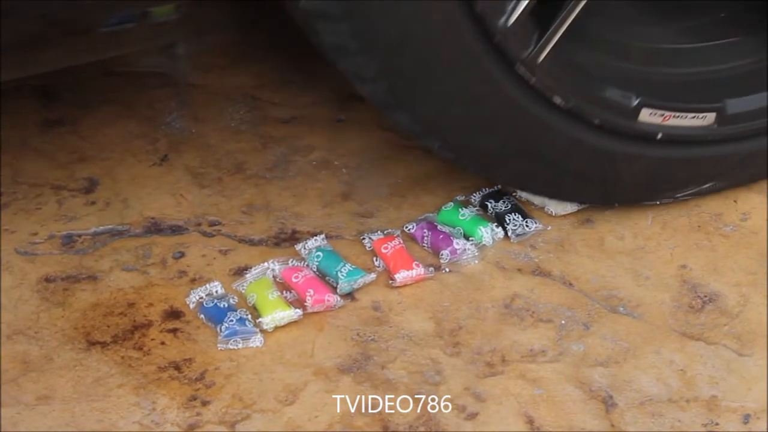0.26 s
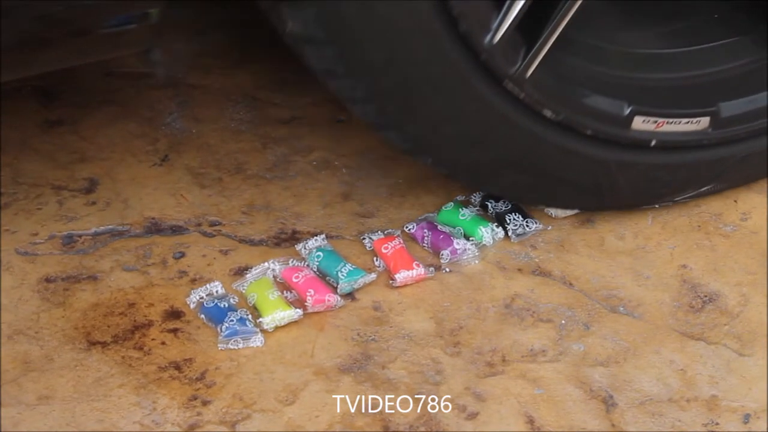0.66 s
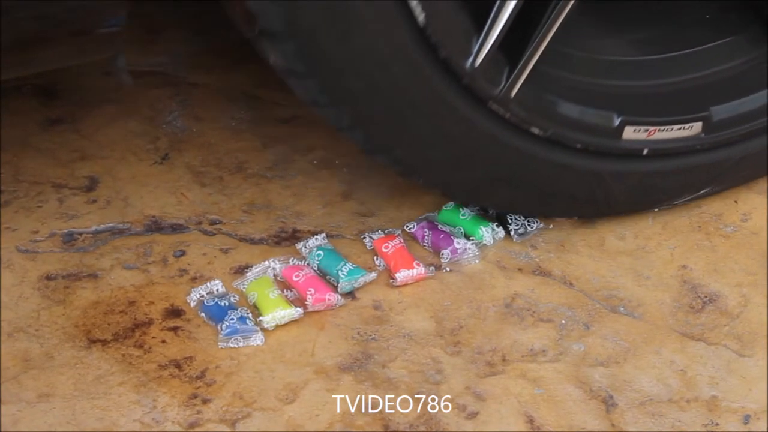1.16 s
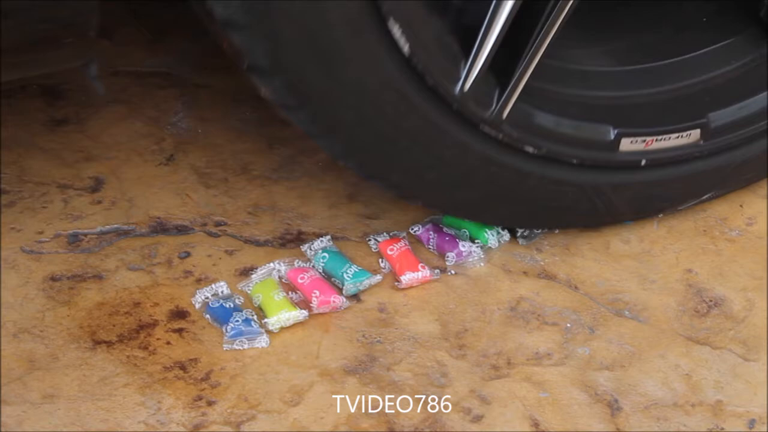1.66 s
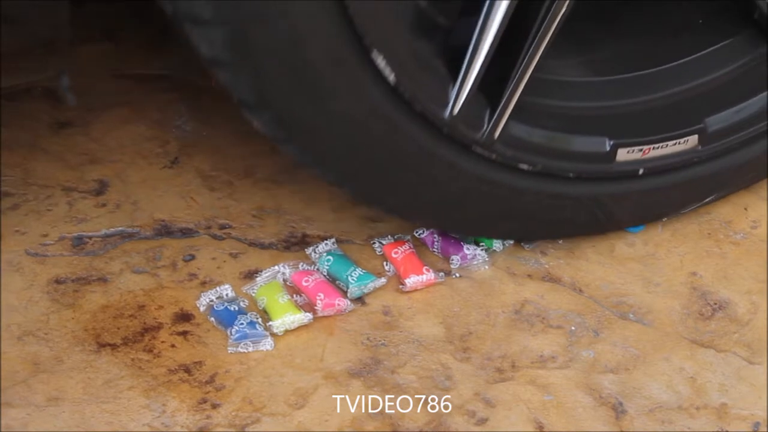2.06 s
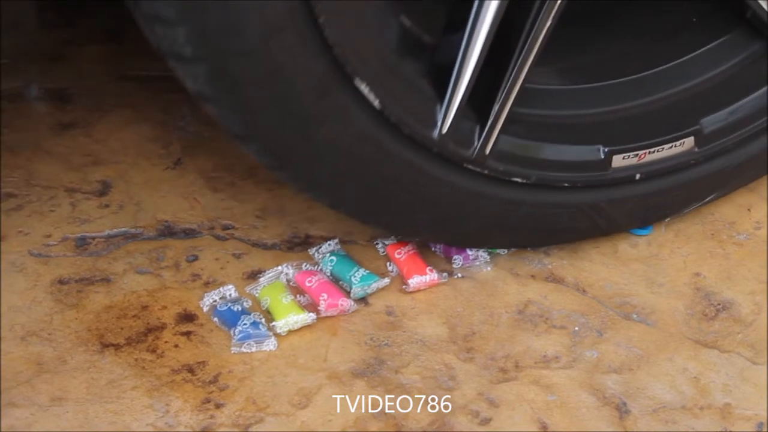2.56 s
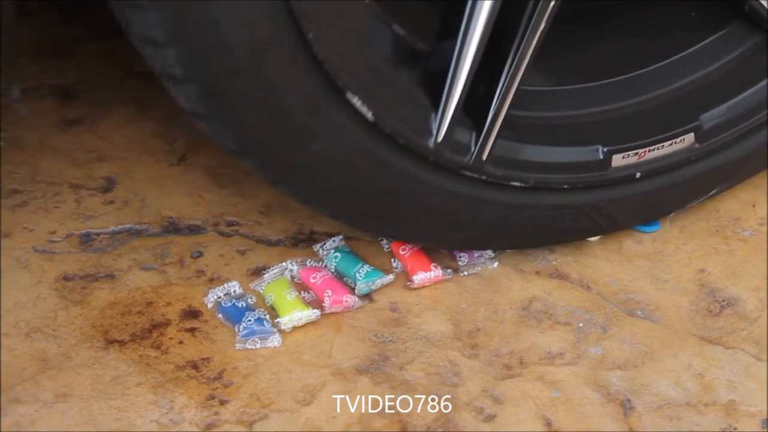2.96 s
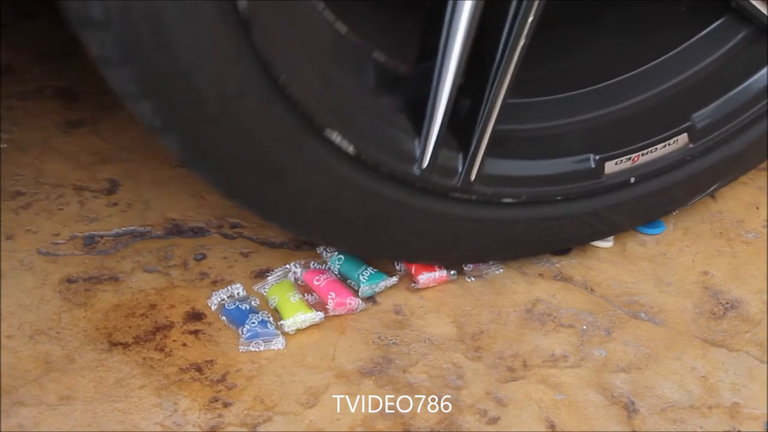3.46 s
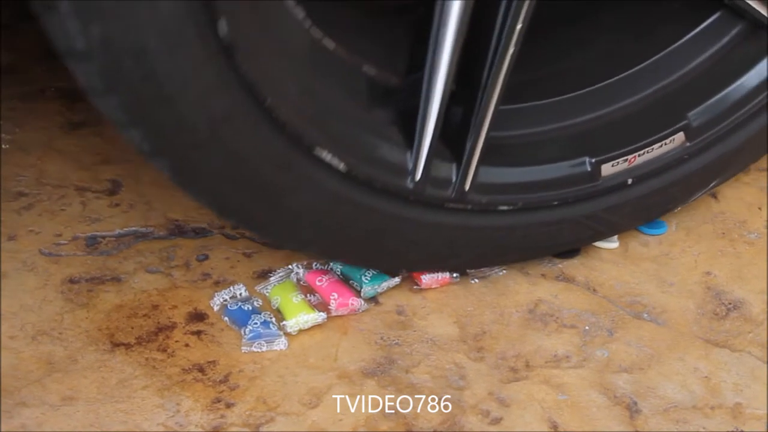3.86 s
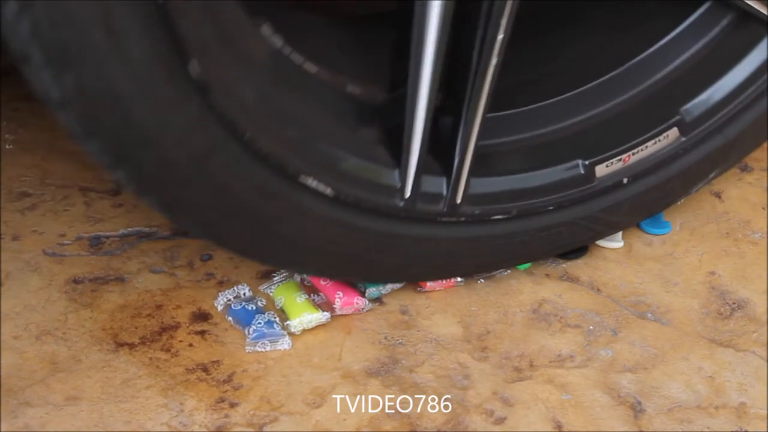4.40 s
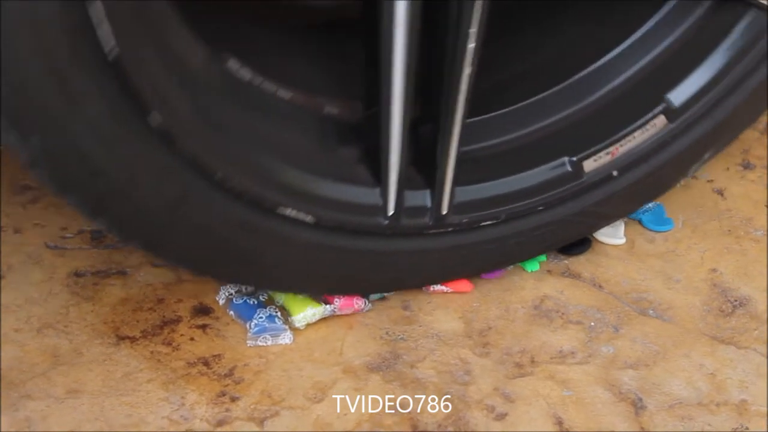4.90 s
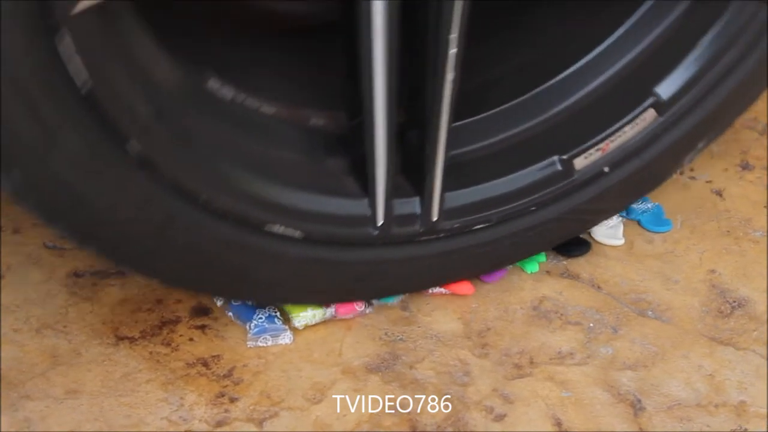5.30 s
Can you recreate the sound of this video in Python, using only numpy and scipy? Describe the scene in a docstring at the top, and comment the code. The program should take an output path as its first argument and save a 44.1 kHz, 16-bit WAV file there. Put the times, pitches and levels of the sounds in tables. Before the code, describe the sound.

Close mono pickup in a big, hard-walled hall: a low engine idle first, then faint plastic crackle and small air pops, then a series of heavy packet bursts under a creeping tyre. The bangs differ in pitch, clip harshly and leave long echoing tails, with the level dipping and recovering after each. Film snaps continue between them, and the last pops are smaller.

```python
"""Small sealed plastic packets burst under the tyre of a car creeping over the concrete floor of a large, hard hall.
Each bang is a band-limited puff with a short ring and a film crack; smaller air pockets pop the same way.
Squeezed film snaps and crinkles as short shaped pulses; the walls add single echoes and a noise-like tail.
The idling engine is shaped noise with two unsteady low tones.
The recorder's gain control ducks at each bang and swells with the echo, and the bangs overload it."""
import sys
import numpy as np
from scipy import signal
from scipy.fft import rfft, irfft, next_fast_len
from scipy.io import wavfile
from scipy.ndimage import map_coordinates

SR = 44100
rng = np.random.default_rng(int(sys.argv[2]) if len(sys.argv) > 2 else 0)


def waveform_to_disk(signal):
    """Save audio, clipped to [-1, 1], as 16-bit WAV at the path in sys.argv[1]."""
    frames = np.transpose(np.atleast_2d(signal))
    scaled = np.clip(frames, -1, 1) * 32767
    samples = np.round(scaled).astype(np.int16)
    wavfile.write(sys.argv[1], SR, samples)


N = 244314  # length in samples

# packets that burst wide open: [t/s, level/dB, ring f/Hz, low edge f/Hz, high edge f/Hz,
# scatter level/dB, wall echo level/dB]
PACKET_BURSTS = [(0.7217, 12, 817, 238, 1505, -4.5, -4), (1.043, 16, 1320, 517, 1780, 0.5, -6.5),
                 (1.6785, 22.5, 844, 190, 1457, 9, -6), (2.6635, 20, 446, 338, 698, -1.5, 1.5),
                 (3.6372, 24.5, 679, 253, 1750, 10, 1.5), (4.1804, 24, 950, 396, 1225, 21, -5.5),
                 (4.658, 31, 1060, 670, 1340, 2.5, -1.5)]
# small air pockets that pop: [t/s, level/dB, film crack level/dB]
POCKET_POPS = [(0.4760, -14.5, -29), (0.4958, -18, -23), (0.5115, -23, -19), (0.5536, -4, -25),
               (2.6232, 8.5, -16), (3.038, -11, -34), (5.1968, 7.5, -20.5), (5.3455, -7, -47)]
# loudest snaps of the squeezed film: [t/s, relative level/dB]
FILM_SNAPS = [(0.343, -21), (0.375, -20), (0.6726, -12.5), (2.1775, -13), (2.2715, -13), (2.5564, -15),
              (2.619, -8), (2.6545, -1.5), (3.0365, -3), (3.2075, -5), (3.5634, -10.5), (4.57, -6),
              (5.246, -2), (5.2884, 0.5), (5.4351, -9.5), (5.472, -9)]
# spectrum of slack film: [f/Hz, relative level/dB]
SLACK_FILM = [(100, -38.5), (500, 3.5), (1000, -1.5), (2000, 3.5), (3000, -16), (6000, -17)]
# spectrum of taut film: [f/Hz, relative level/dB]
TAUT_FILM = [(200, -18.5), (1200, 5), (2400, 17), (3600, 9), (6000, -11)]
# single echoes from the far walls: [delay t/s, relative level/dB]
WALL_ECHOES = [(0.0317, -19.5), (0.0433, -21), (0.0855, -21), (0.1024, -16.5), (0.349, -30.5),
               (0.4229, -33)]
# reverberation time of the hall: [f/Hz, t60/s]
HALL_T60 = [(120, 1.33), (400, 1.76), (900, 1.676), (2000, 1.29), (5000, 0.97)]
# spectrum of engine, fan and tyre in the hall: [f/Hz, relative level per Hz/dB]
IDLE_SPECTRUM = [(15, -42), (25, -7.5), (95, -3), (146, -9), (183, -4.5), (225, -9.5), (302, -10.5),
                 (362, -14.5), (414, -10.5), (497, -17), (875, -16.5), (3480, -43.5), (4780, -50.5),
                 (5600, -62), (7280, -83), (12300, -120)]
# engine orders: [mean f/Hz, mean level/dB]
ENGINE_ORDERS = [(86, -45), (183, -45.5)]
# treble colour after clipping, a dip near 7 kHz and milder above: [f/Hz, level/dB]
TREBLE_COLOUR = [(5600, 0), (7000, -24.5), (11000, -1), (15000, -7.5)]

BURST_CRACK_DB, BURST_HALL_DB = -28, -8.5  # tearing film and hall tail, against the puff
POP_RING_HZ, POP_LOW_HZ, POP_HIGH_HZ = 990, 696, 2100  # the band that all pockets share
POP_SCATTER_DB, POP_HALL_DB, POP_WALLS_DB = -9, -12.5, -5
SLACK_DB = -2.5  # slack film against taut film in a snap
FIRST_TOUCH = 0.34  # the tread meets the first packet (s)
CAR_DB, CAR_RISE_DB_PER_S = -24, 0.63  # the car grows louder as it creeps closer
BAND_TOP_HZ, OUTPUT_TOP_HZ = 5900, 16000  # upper band limits before and after clipping


def packets(scatter_t60=0.053):
    """Impulsive sources: each packet's own spot and direction draws a different answer from the hall."""
    out = np.zeros(N)
    for s, db, ring_hz, low_hz, high_hz, scatter_db, walls_db in PACKET_BURSTS:
        bang = amp(db) * burst(ring_hz, low_hz, high_hz, BURST_CRACK_DB)
        add(out, s, nearby(bang, scatter_db, scatter_t60))
        add(out, s, signal.fftconvolve(bang, hall(BURST_HALL_DB, walls_db)))
    return out


def burst(ring_hz, low_hz, high_hz, crack_db, ring_db=-5, ring_width_hz=130,
          rise=1.83, fall=3.27, crack_hz=4000):
    """Pressure release: a puff whose band depends on packet size, a short resonance and a film crack."""
    def colour(f):
        below = (low_hz / f) ** (2 * rise)
        above = (f / high_hz) ** (2 * fall)
        puff = 1 / np.sqrt((1 + below) * (1 + above))
        ring = amp(ring_db) / (1 + (2 * (f - ring_hz) / ring_width_hz) ** 2)
        crack = amp(crack_db) / (1 + (f / crack_hz - crack_hz / f) ** 2)
        return np.hypot(puff * (1 + ring), crack)
    return pulse(colour) * np.sqrt(SR / 100)  # the energy of 10 ms at rms 1


def pockets(scatter_t60=0.041):
    """Pressure release on a small scale: pockets of trapped air give way in one shared band."""
    out = np.zeros(N)
    for s, db, crack_db in POCKET_POPS:
        pop = amp(db) * burst(POP_RING_HZ, POP_LOW_HZ, POP_HIGH_HZ, crack_db)
        add(out, s, nearby(pop, POP_SCATTER_DB, scatter_t60))
        add(out, s, signal.fftconvolve(pop, hall(POP_HALL_DB, POP_WALLS_DB)))
    return out


def film(snap_db=10, crinkle_db=-29, crinkle_spread_db=6.0, hall_db=-7, count=360):
    """Impulse noise of buckling film: snaps under the tread among finer random crinkles and grit."""
    slack = pulse(lambda f: amp(along(SLACK_FILM, f)))
    taut = pulse(lambda f: amp(along(TAUT_FILM, f)))
    out = np.zeros(N)
    for s, db in FILM_SNAPS:
        snap = amp(db + snap_db) * (taut + amp(SLACK_DB) * slack)
        add(out, s, nearby(snap, scatter_db=2, scatter_t60=0.012))
    for when, size in rng.random((count, 2)):
        strength = min(-np.log(1 - size), 4)  # exponential: many weak, few strong
        crinkle = amp(crinkle_db + crinkle_spread_db * strength) * (taut + slack)
        s = FIRST_TOUCH + when * (N / SR - FIRST_TOUCH)
        add(out, s, nearby(crinkle, scatter_db=15.5, scatter_t60=0.022))
    return out + signal.fftconvolve(out, hall(hall_db, walls_db=-1.5))[:N]


def nearby(x, scatter_db, scatter_t60, gap=0.0011):
    """Energy division: part comes straight, part scatters between tyre, floor and wheel arch."""
    t = np.arange(SR // 8) / SR
    scatter = rng.standard_normal(len(t)) * amp(-60 * t / scatter_t60) * (t > gap)
    late = signal.fftconvolve(x, scatter)
    y = amp(scatter_db) * late * np.linalg.norm(x) / np.linalg.norm(late)
    y[:len(x)] += x
    return y * np.linalg.norm(x) / np.linalg.norm(y)  # total energy kept


def hall(tail_db, walls_db, build=0.0084, uneven_db=6, flutter_db=1.74, flutter_rate=45, dull_hz=3200):
    """Reverberation: wall echoes over a clumped diffuse tail whose high treble is weaker and dies first."""
    uneven = uneven_db * np.minimum(rng.standard_normal(2 * SR), 3)
    clumps = flutter_db * wobble(flutter_rate)[:2 * SR]
    reflections = amp(uneven + clumps) * rng.standard_normal(2 * SR)
    hz, t, z = signal.stft(reflections, SR, nperseg=256)
    decay = amp(-60 * t / along(HALL_T60, hz)[:, None])
    onset = 1 - np.exp(-t / build)
    tail = signal.istft(z * decay * onset, SR, nperseg=256)[1]
    answer = amp(tail_db) * tail / np.linalg.norm(tail)
    for delay, db in WALL_ECHOES:
        answer[round(delay * SR)] += amp(db + walls_db)
    keep = np.exp(-2 * np.pi * dull_hz / SR)
    return signal.lfilter([1 - keep], [1, -keep], answer)


def car(throb_db=1.77, drift=0.016, hum_waver_db=4.5):
    """Broadband and tonal radiation: the idle is a dull rush with two unsteady low engine orders."""
    t = np.arange(N) / SR
    rush = unit(filtered(rng.standard_normal(N), lambda f: amp(along(IDLE_SPECTRUM, f))))
    rush_db = CAR_DB + CAR_RISE_DB_PER_S * t + throb_db * wobble(32)
    turns = np.cumsum(1 + drift * wobble(5.1)) / SR  # both orders drift together
    hum = np.zeros(N)
    for hz, db in ENGINE_ORDERS:
        tone = unit(np.sin(2 * np.pi * hz * turns))
        hum += amp(db + hum_waver_db * wobble(30)) * tone
    return amp(rush_db) * rush + hum


def scene():
    """Superposition: bursts, pops and crinkling film over the idling car, in mono."""
    return (packets() + pockets() + film() + car())[None]


def gain_control(x, ceiling_db=4.0, release_db_per_s=29, memory=0.0051):
    """Level compression: gain drops just after the level passes the ceiling, then climbs steadily."""
    keep = np.exp(-1 / (memory * SR))  # memory in seconds
    power = signal.lfilter([1 - keep], [1, -keep], x ** 2)
    excess = np.maximum(10 * np.log10(power + 1e-12) - ceiling_db, 0)
    climb = release_db_per_s * np.arange(N) / SR
    gain_db = climb - np.maximum.accumulate(excess + climb)
    return x * amp(gain_db)


def record(dry, bass_hz=38):
    """Nonlinear distortion: after a band limit and gain control, clipping alone makes the top treble."""
    limited = filtered(dry[0], lambda f: 1 / np.sqrt(1 + (f / BAND_TOP_HZ) ** 80))
    limited = filtered(limited, lambda f: f ** 2 / np.hypot(f ** 2, bass_hz ** 2))
    clipped = np.clip(gain_control(limited), -1, 1)
    coloured = filtered(clipped, lambda f: amp(along(TREBLE_COLOUR, f)))
    return filtered(coloured, lambda f: 1 / np.sqrt(1 + (f / OUTPUT_TOP_HZ) ** 120))[None]


def pulse(response, size=2048):
    """Minimum phase: the sharpest causal pulse with this gain over frequency, at energy 1."""
    gain = np.maximum(response(np.fft.rfftfreq(size, 1 / SR) + 1), 1e-5)  # + 1 Hz avoids zero
    cepstrum = irfft(np.log(gain))
    y = irfft(np.exp(rfft(2 * cepstrum[:size // 2], size)))  # causal half of the cepstrum, doubled
    return y / np.linalg.norm(y)


def filtered(x, response):
    """Linear filtering: the spectrum of x times a response of frequency."""
    m = next_fast_len(N + SR // 2)
    return irfft(rfft(x, m) * response(np.fft.rfftfreq(m, 1 / SR)), m)[:N]


def wobble(rate):
    """Slow random modulation: a smooth curve through rate random knots a second."""
    knots = rng.standard_normal(int(N * rate / SR) + 4)
    return map_coordinates(knots, [np.arange(N) * rate / SR])


def along(points, hz):
    """Interpolation of [f/Hz, value] points on a logarithmic frequency axis."""
    f, v = np.transpose(points)
    return np.interp(np.log(hz + 1), np.log(f + 1), v)


def add(track, s, sound):
    """Superposition: mix a sound into the track at s seconds."""
    i = max(round(s * SR), 0)
    track[i:i + len(sound)] += sound[:N - i]


def amp(db):
    """Level law: the amplitude ratio of a level in dB."""
    return 10 ** (np.asarray(db) / 20)


def unit(x):
    """Normalization: x at rms 1."""
    return x / np.sqrt(np.mean(x ** 2) + 1e-20)


dry = scene()
out = record(dry)
waveform_to_disk(out)
```